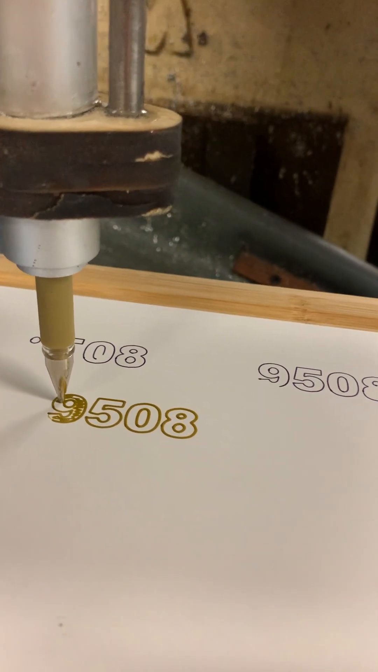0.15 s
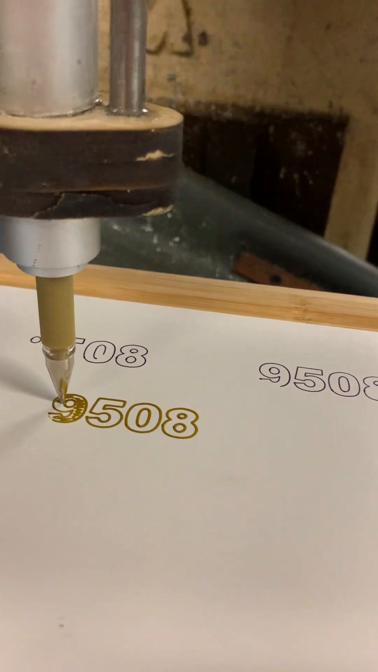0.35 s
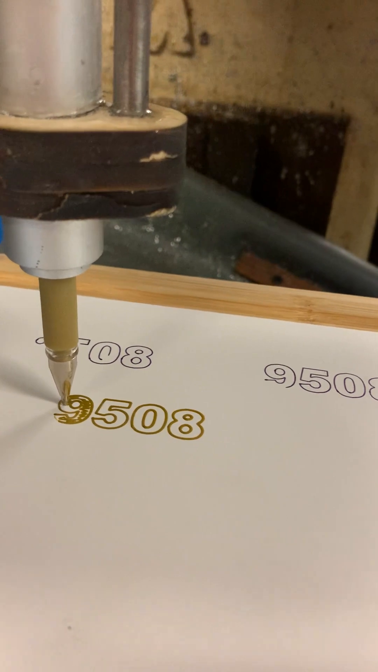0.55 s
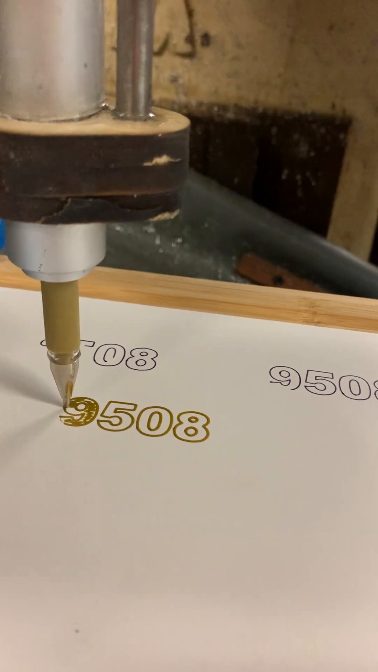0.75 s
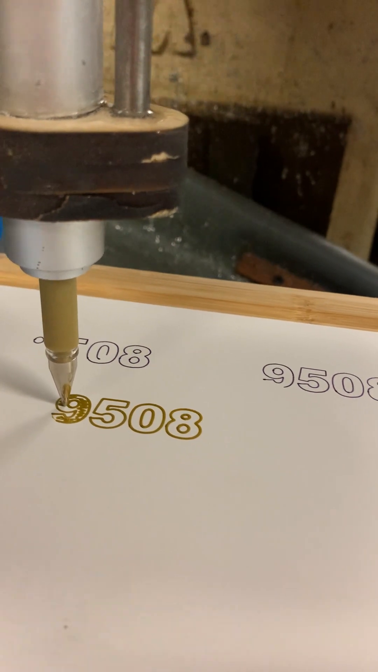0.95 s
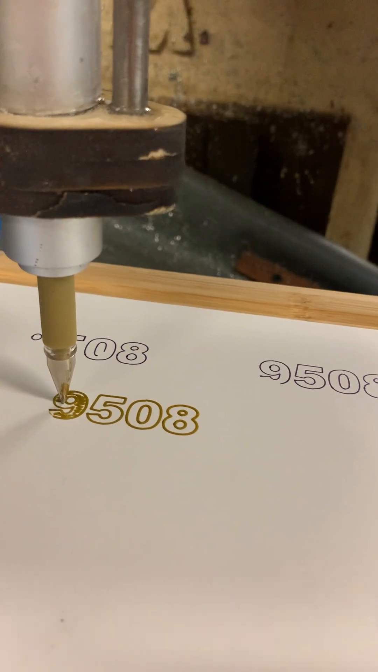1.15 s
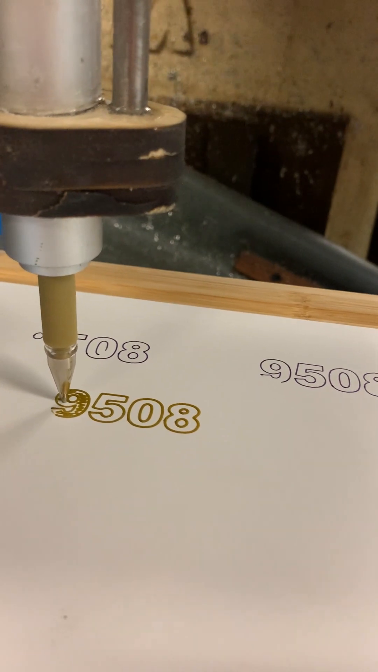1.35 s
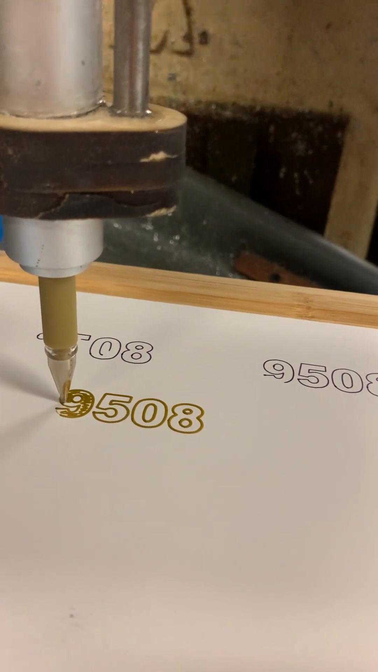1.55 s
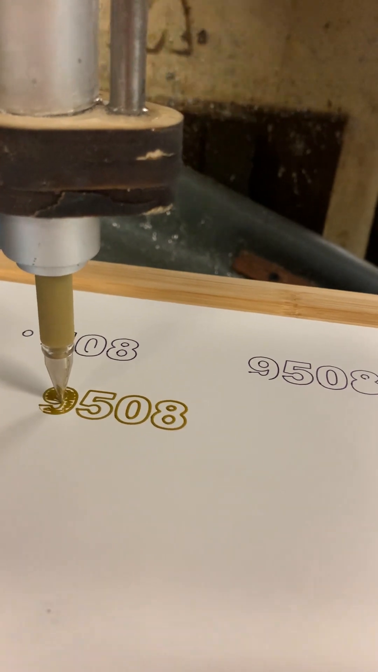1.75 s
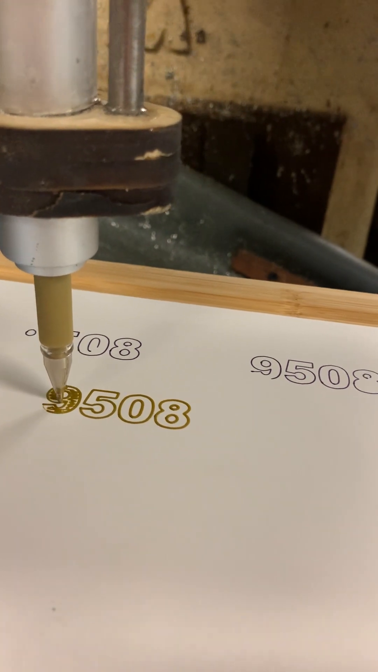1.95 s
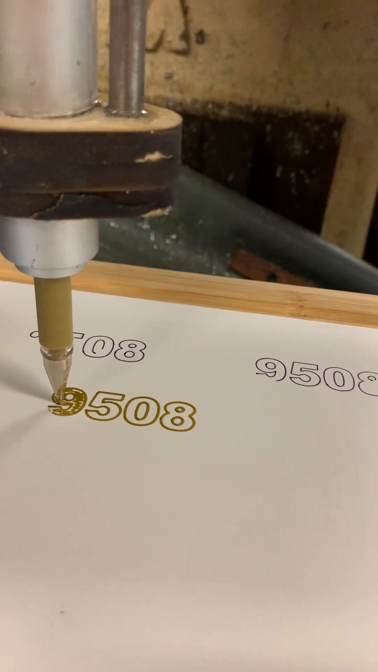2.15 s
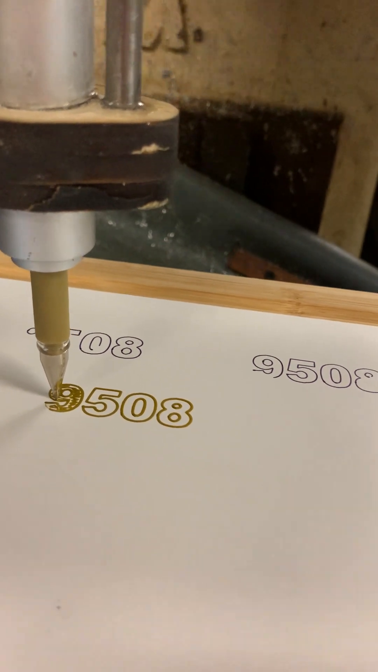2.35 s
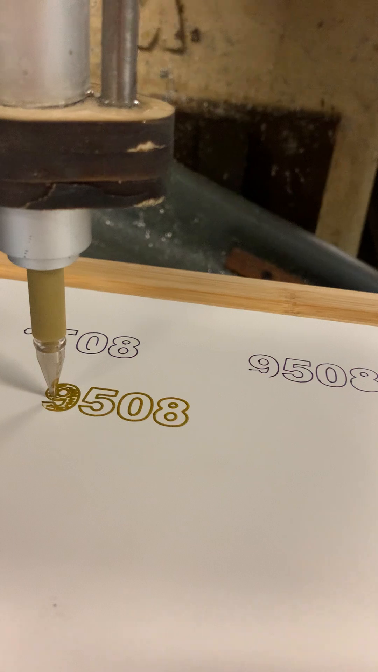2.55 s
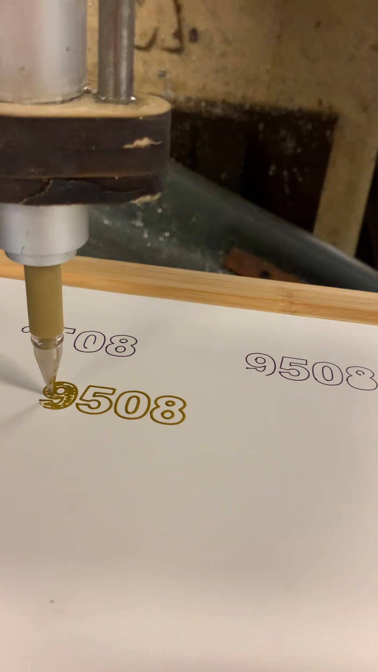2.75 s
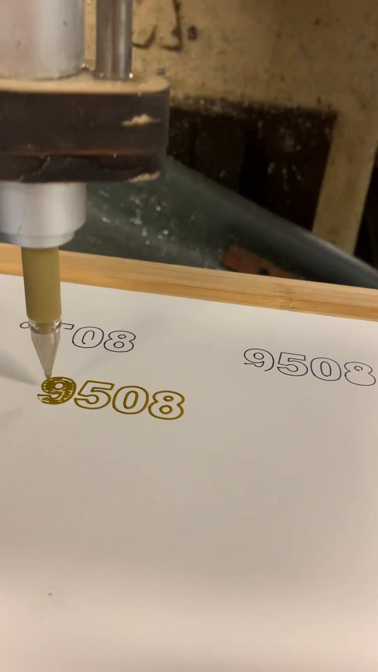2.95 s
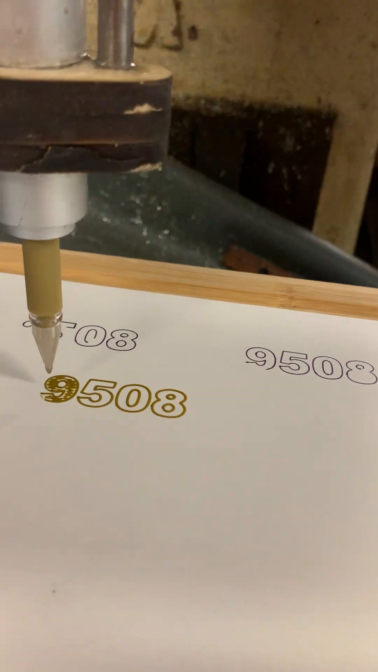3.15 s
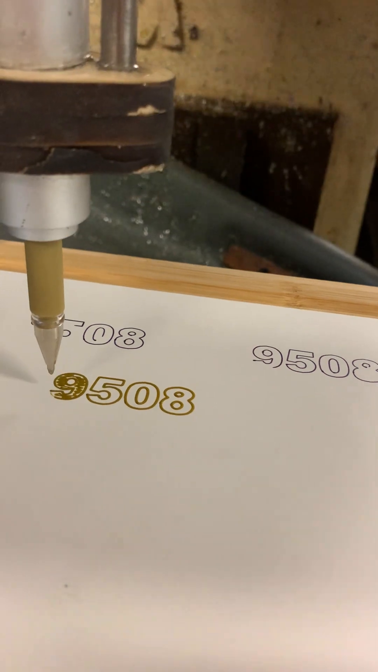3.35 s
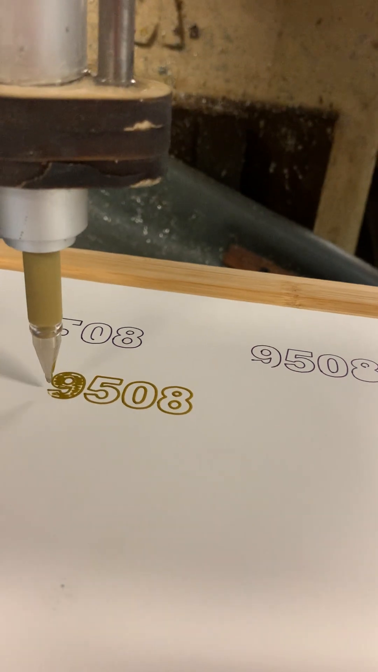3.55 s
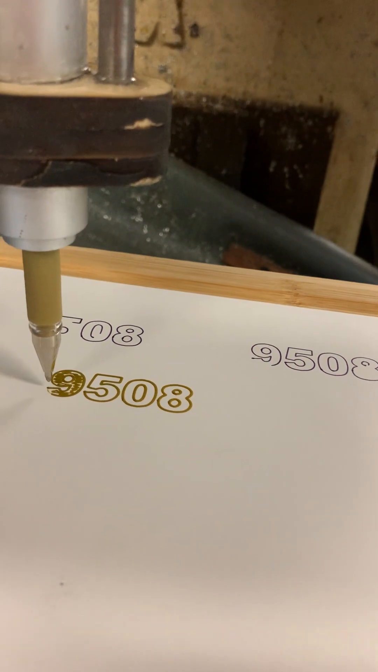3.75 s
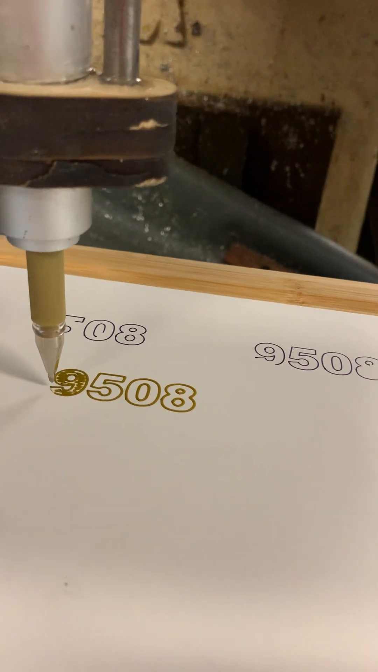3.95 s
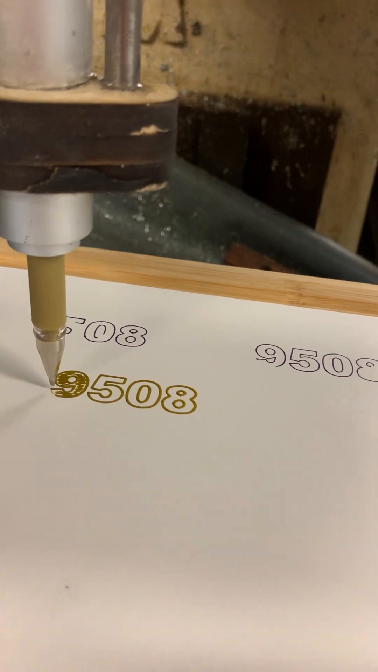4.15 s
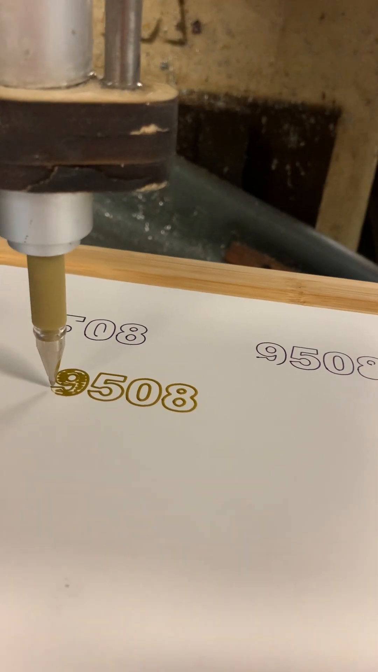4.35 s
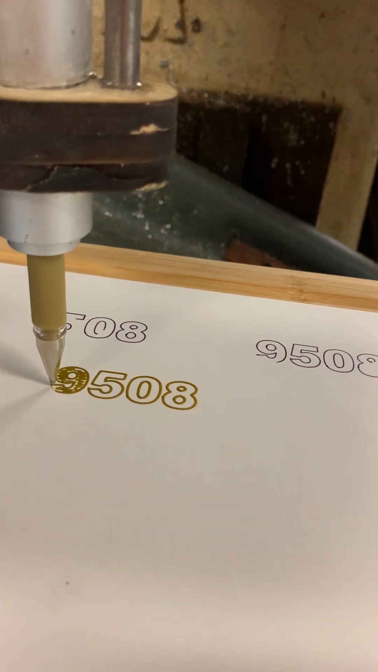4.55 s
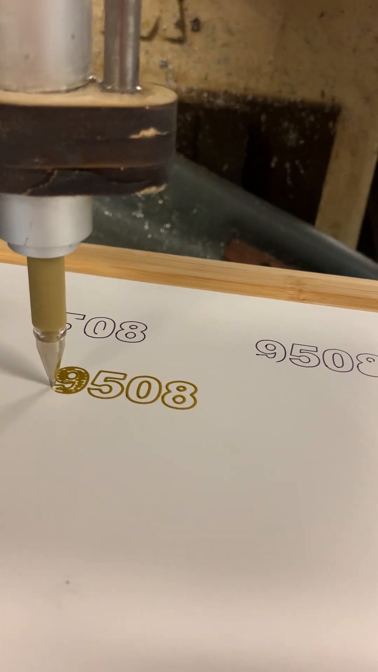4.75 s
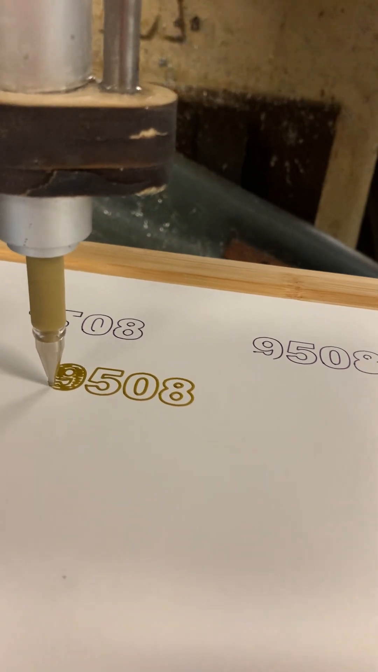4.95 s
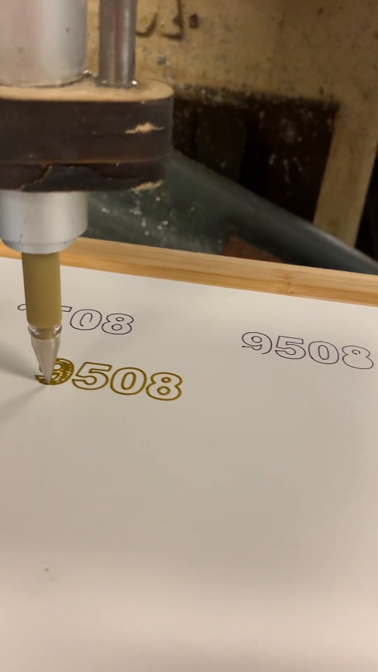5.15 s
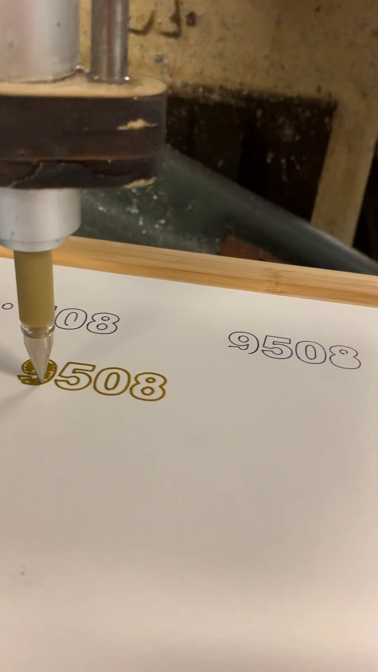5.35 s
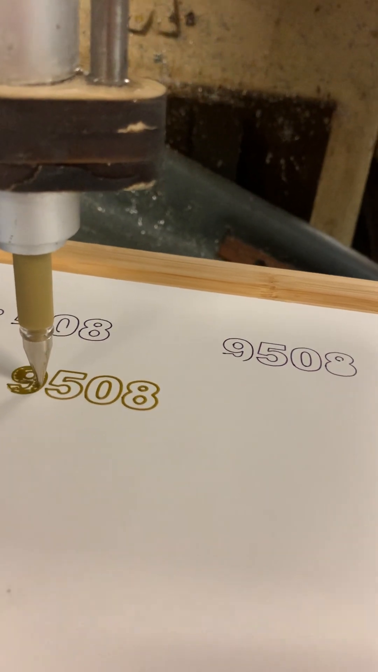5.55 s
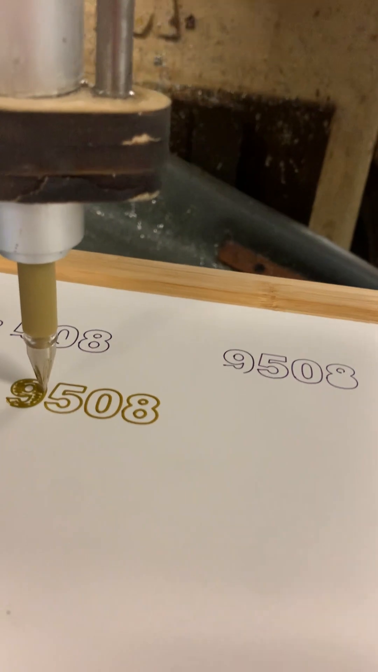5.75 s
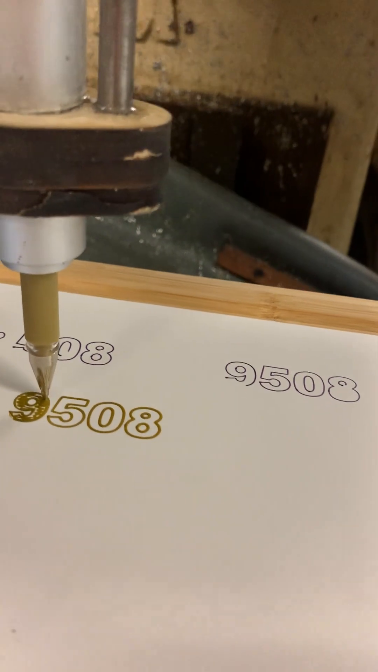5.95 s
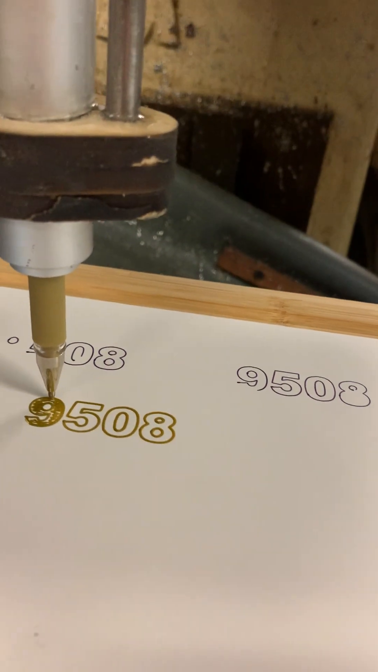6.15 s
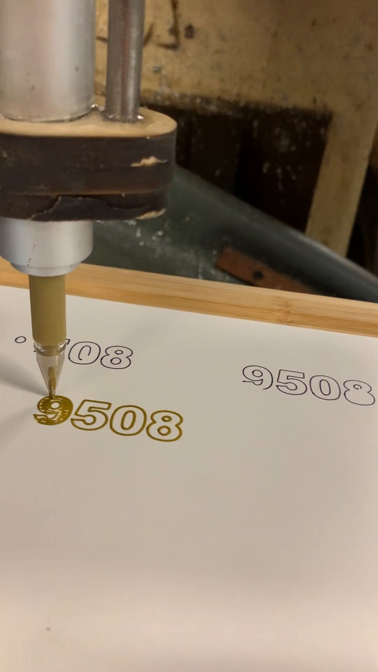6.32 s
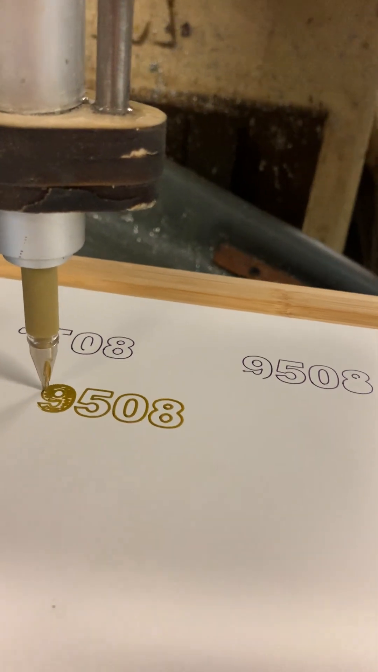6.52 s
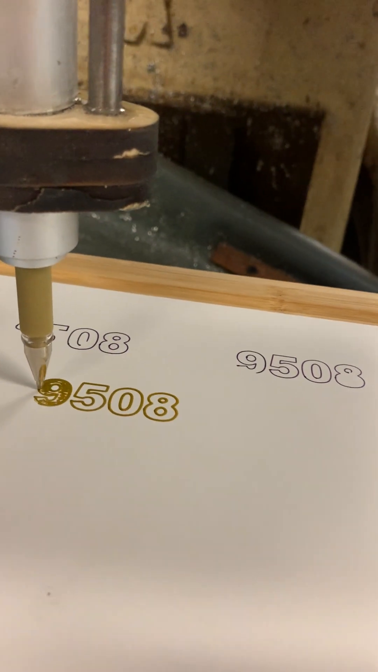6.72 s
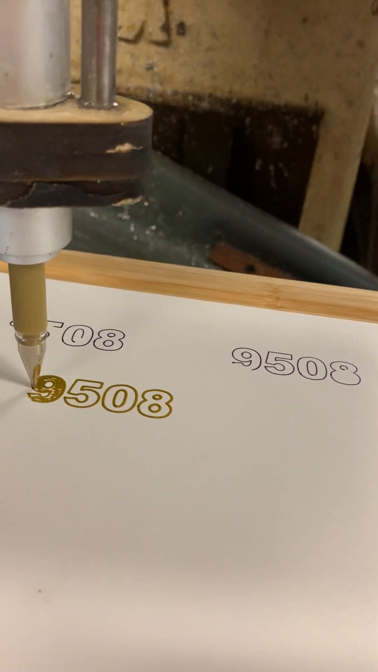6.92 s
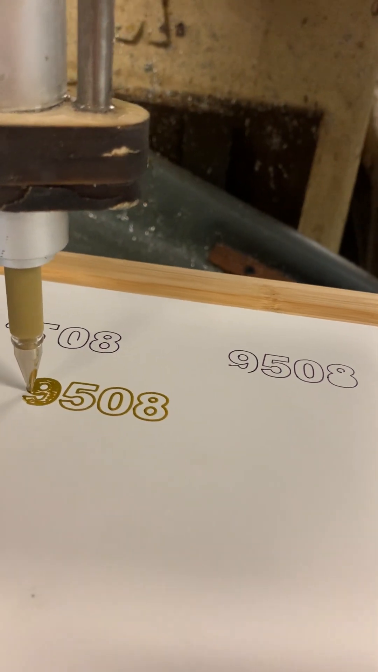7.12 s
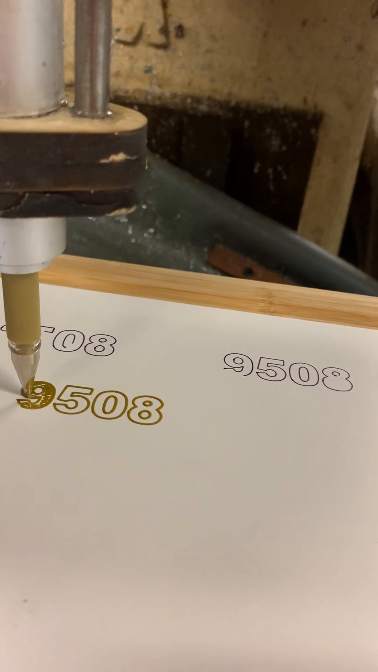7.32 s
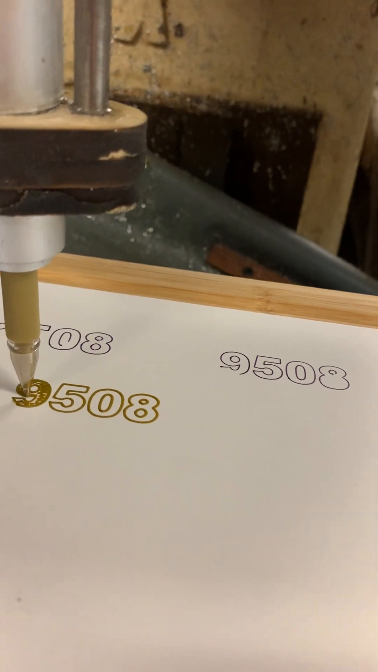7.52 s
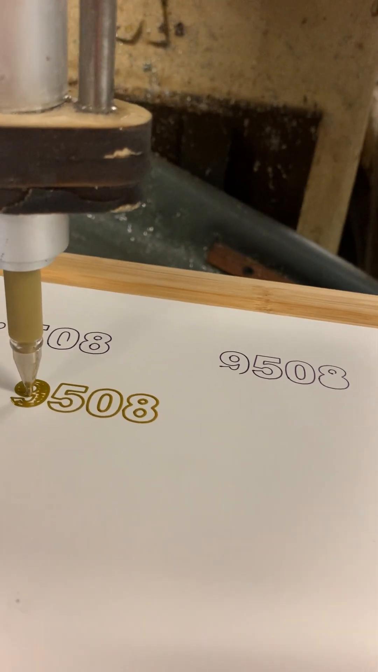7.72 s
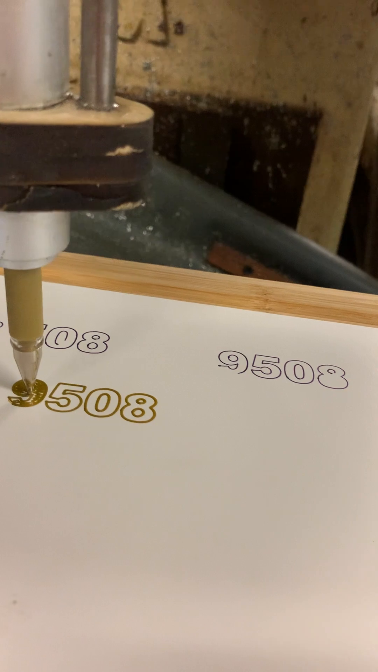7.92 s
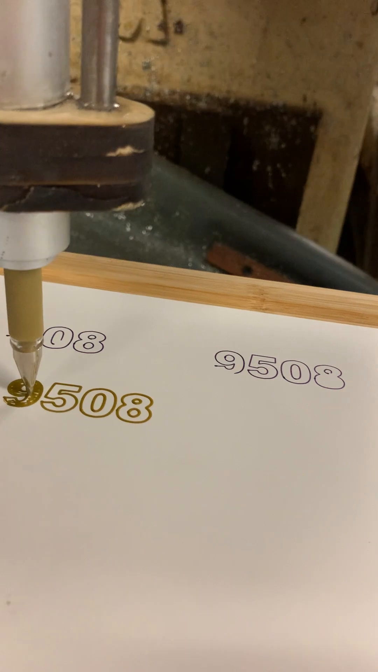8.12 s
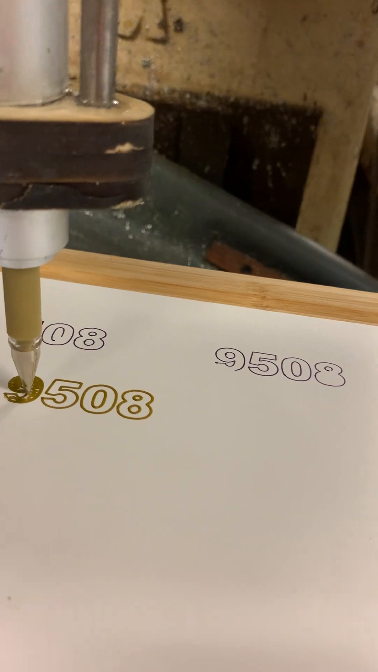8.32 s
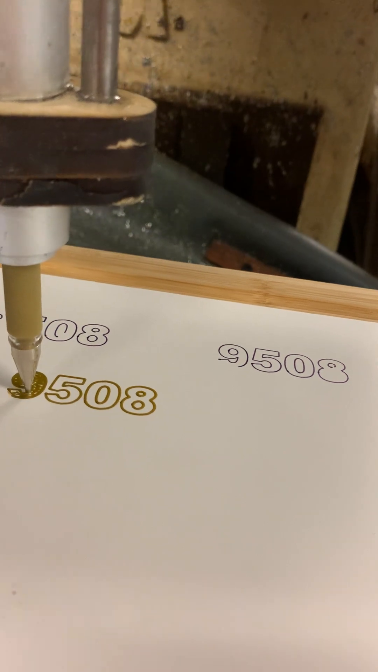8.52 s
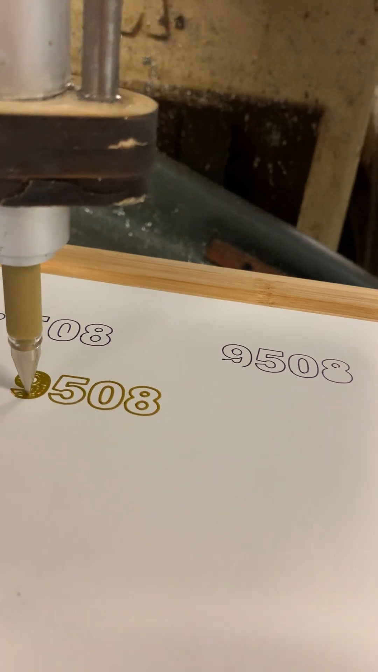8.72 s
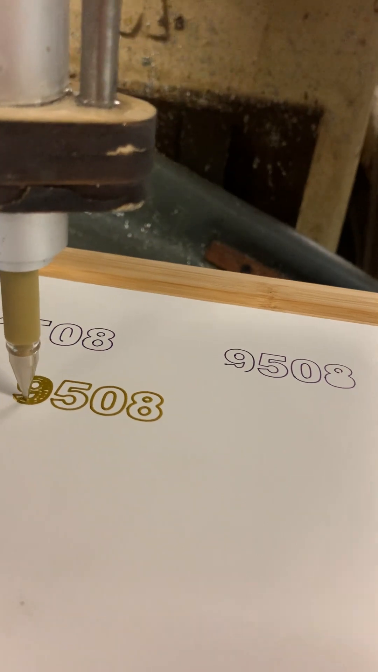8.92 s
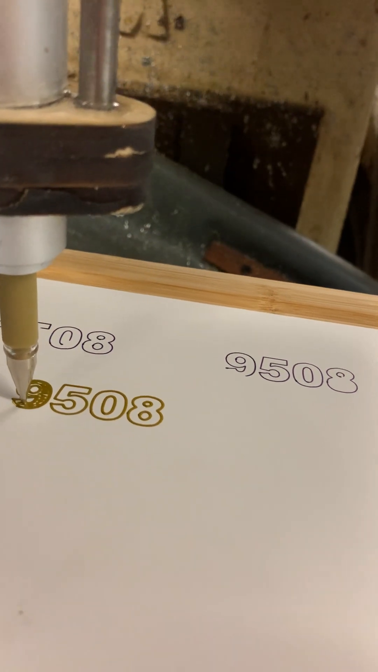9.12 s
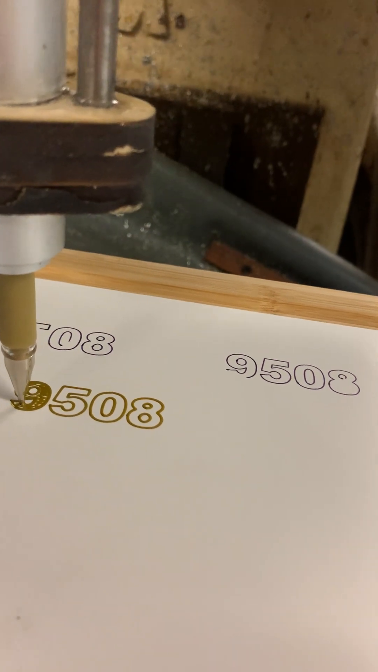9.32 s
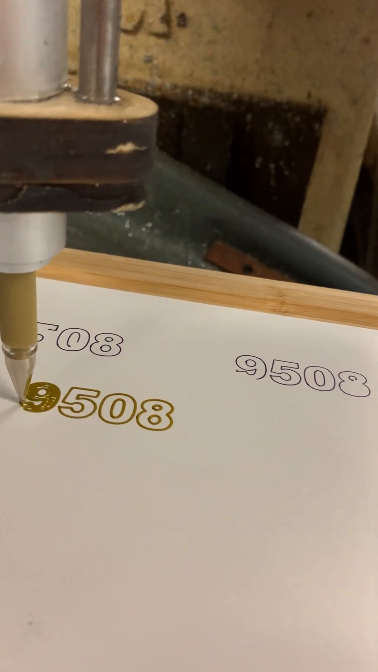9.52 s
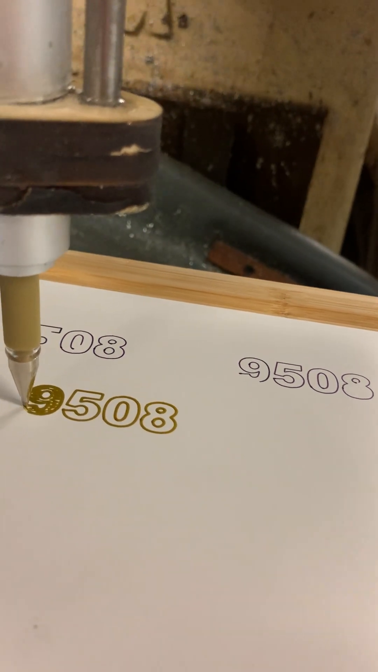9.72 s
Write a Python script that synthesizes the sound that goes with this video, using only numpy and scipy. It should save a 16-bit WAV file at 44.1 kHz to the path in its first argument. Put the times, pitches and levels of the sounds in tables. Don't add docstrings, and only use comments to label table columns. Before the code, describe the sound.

Close stereo pickup of a small motorised drawing machine in an indoor workshop. A low, steady fan and motor rumble lies beneath irregular hollow knocks and short hisses as the carriage reverses. Near three seconds two brief bright rasps lift and lower the pen, rattling the table. Dry, high ticks cluster just after four seconds, then sparser soft knocks continue to the end.

```python
import sys
import numpy as np
from scipy import signal
from scipy.fft import rfft, irfft, next_fast_len
from scipy.io import wavfile
from scipy.ndimage import uniform_filter1d, minimum_filter1d

SR = 44100
rng = np.random.default_rng(int(sys.argv[2]) if len(sys.argv) > 2 else 0)


def wav_out(sig):
    wavfile.write(sys.argv[1], SR, np.round(np.clip(np.atleast_2d(sig).T, -1, 1) * 32767).astype(np.int16))


def voltage_ratio(decibels):
    exponent = np.asarray(decibels, float) / 20
    return 10 ** exponent


N = 431277

# start in seconds, length in seconds, rasp level in dB,
# screw rumble level at full speed in dB, easing-in time in seconds.
LIFTS = [
    (2.854, 0.19, -41, -48, 0.0036),
    (3.429, 0.15, -39.5, -51, 0.0013),
]


def rms_one(x):
    return x / np.sqrt(np.mean(x ** 2) + 1e-20)


def at_hz(points, hz):
    p = np.array(points)
    return np.interp(np.log(hz + 1), np.log(p[:, 0]), p[:, 1])


def coloured(x, spectrum):
    size = next_fast_len(N)
    hz = np.arange(size // 2 + 1) * SR / size
    low_cut = np.minimum(hz / spectrum[0][0], 1) ** 2
    gain = voltage_ratio(at_hz(spectrum, hz)) * low_cut
    return rms_one(irfft(rfft(x, size) * gain, size)[..., :N])


def drift(rate):
    r = np.exp(-80 * np.pi * rate / SR)
    slow = signal.lfilter([1], [1, -2 * r, r * r], rng.standard_normal(N // 40 + 2002))[2000:]
    return np.interp(np.arange(N) / 40, np.arange(len(slow)), rms_one(slow))


def whistle(hz, width_hz):
    r = np.exp(-np.pi * width_hz / SR)
    a = [1, -2 * r * np.cos(2 * np.pi * hz / SR), r * r]
    noise = rng.standard_normal((2, N + SR // 4))
    once = signal.lfilter([1, 0, -1], a, noise)
    return rms_one(signal.lfilter([1], a, once)[:, SR // 4:])


def band(x, hz, octaves):
    edges = np.clip(hz * 2 ** (octaves * np.array([-.5, .5])), 50, .45 * SR)
    return signal.sosfilt(signal.butter(2, edges, "band", fs=SR, output="sos"), x)


def within(hz, low, high):
    return (np.tanh((hz - low) / 70) - np.tanh((hz - high) / 70)) / 2


def runs(rows):
    t = np.arange(N) / SR
    held = sum(voltage_ratio(db) * ((t >= start) & (t < end)) for start, end, db in rows)
    fade_s = 0.08
    return uniform_filter1d(held, size=round(fade_s * SR))


def grit(spread_db):
    return rng.standard_normal((2, N)) * voltage_ratio(spread_db * rng.exponential(1, N).clip(0, 4))


def burst(out_len, decay_s, noise, rise_s=0.00035):
    t = np.arange(out_len) / SR
    return noise * (1 - np.exp(-t / rise_s)) * np.exp(-t / decay_s)


def workshop(level_db):
    # frequency in Hz, density in dB per Hz.
    air_spectrum = [(25, -46), (50, -3), (78, 2.5), (130, -0.9), (260, -7.5), (450, -9.5), (900, -20),
                    (1300, -21.5), (2200, -26), (2900, -32.5), (4400, -36), (6800, -49), (9000, -57.5),
                    (12000, -54.5), (15500, -60)]
    # frequency in Hz, width in Hz, rms level in dB.
    duct_hums = [(77.76, 8.8, -45.5), (94.8, 8.2, -55), (187.3, 59, -44), (256.4, 31, -52.5),
                 (408.2, 9.3, -57.5), (643.6, 36, -57), (881.7, 70, -56.5), (1339, 87, -67),
                 (1620, 90, -65.5), (1871, 100, -64), (2000, 430, -68.5), (2260, 81, -68.5),
                 (3160, 150, -72), (5450, 1700, -67)]
    air = voltage_ratio(level_db + .5 * drift(7.4)) * coloured(rng.standard_normal((2, N)), air_spectrum)
    treble = band(air, 6500, 2.2)
    air += (voltage_ratio(1.4 * drift(83.0)) - 1) * treble
    air += sum((voltage_ratio(1.4 * drift(25.)) - 1) * band(air, hz, 0.6) for hz in (1005, 1400, 1950, 2820))
    return air + sum(voltage_ratio(db) * whistle(hz, width) for hz, width, db in duct_hums)


def motor_tones():
    motor_hz = [76.7, 119.8, 221.4, 256.4, 259.1, 284.6, 331.7, 407.1, 465.0, 596.2, 646.0, 765.8]
    motor_db = [-50.5, -46.5, -52.5, -53, -45.5, -60, -59, -56.5, -61, -63, -60.5, -67]
    out = np.zeros(N)
    for hz, db in zip(motor_hz, motor_db):
        turns = np.cumsum(hz * (1 + .002 * drift(1.5))) / SR + rng.random()
        out += voltage_ratio(db - .5 + 2.5 * drift(3.)) * np.sqrt(2) * np.sin(2 * np.pi * turns)
    return out * [[1], [0]]


def rail_whistle():
    # start in seconds, end in seconds, level in dB.
    working = [(0, 2.07, -64), (2.07, 2.83, -61), (2.85, 3, -55), (3.08, 4.1, -60.5), (3.95, 5.05, -62),
               (5.05, 6.7, -64.5), (7.0, 7.74, -66.5), (7.74, 8.85, -64), (8.85, 9.42, -65.5),
               (9.42, 11.5, -60)]
    # time in seconds, level in dB.
    jerks = [(2.873, -39), (2.913, -33.5), (2.942, -46), (2.966, -48), (2.988, -47), (3.008, -47),
             (3.027, -46), (3.048, -49), (3.41, -49), (3.434, -51), (3.446, -43), (3.462, -52),
             (3.484, -49), (3.522, -51), (3.556, -44), (3.59, -55), (3.602, -57), (2.078, -48.5),
             (1.359, -51), (1.374, -46), (9.51, -49), (9.528, -54), (9.572, -54)]
    whistle_hz, width_hz = 3730, 115.
    attack_s, decay_s, tail_db, tail_s = .003, 0.007, -26, 0.04
    struck = np.zeros(N)
    for s, db in jerks:
        t = np.maximum(np.arange(N) / SR - s, 0)
        dying = np.exp(-t / decay_s) + voltage_ratio(tail_db) * np.exp(-t / tail_s)
        struck += voltage_ratio(db + 7.5) * (1 - np.exp(-t / attack_s)) * dying
    ring = np.sin(2 * np.pi * np.cumsum(whistle_hz + 30 * drift(30.)) / SR)
    return runs(working) * whistle(whistle_hz, width_hz) + struck * ring * [[1], [0]]


def driver_tone():
    # start in seconds, end in seconds, level in dB.
    holding = [(1.7, 1.95, -74), (2.5, 2.86, -83), (2.86, 3.3, -75), (3.63, 4.2, -69.5), (4.2, 4.78, -71.5),
               (4.78, 5.1, -82), (5.1, 5.5, -74), (5.5, 5.72, -82), (5.72, 5.87, -75), (5.87, 6.42, -69.5),
               (6.42, 6.75, -75), (6.75, 7.15, -77), (7.15, 9.42, -72)]
    driver_hz, step_hz = 10314, 49.9
    turns = np.cumsum(driver_hz + 8.0 * drift(60.)) / SR
    steps = np.sin(2 * np.pi * step_hz * np.arange(N) / SR)
    flicker = voltage_ratio(-1.5 + 2.5 * drift(90.) + 3.0 * steps)
    tone = runs(holding) * flicker * np.sqrt(2) * np.sin(2 * np.pi * turns)
    return tone * [[1], [0]]


def carriage_moves():
    # start in seconds, length in seconds, level in dB.
    long_moves = [(0.058, 0.095, -61.5), (0.526, .075, -62), (.857, 0.089, -61), (1.037, .06, -75),
                  (1.357, 0.077, -58.5), (1.626, 0.081, -53), (3.167, 0.069, -58.5), (3.74, .14, -69),
                  (4.892, 0.31, -65), (5.2, 0.14, -67), (6.027, 0.075, -61), (9.424, .081, -60.5),
                  (9.598, .15, -71)]
    # start in seconds,
    # length in seconds, level in dB, centre in Hz.
    creeps = [(0.01, 6.7, -87, 14600), (1.978, 0.038, -64, 11000), (2.075, 0.046, -67, 8460),
              (5.357, 0.15, -67, 13200), (5.58, 0.13, -71.5, 13320), (5.775, .17, -70.5, 13400),
              (6.22, .08, -68, 11100), (6.422, 0.087, -61, 12400), (6.63, 0.065, -64, 12500),
              (7.95, .004, -66, 14000), (8.368, .08, -67, 13300), (9.234, .02, -67, 15220)]
    # start in seconds, length in seconds, level in dB,
    # centre in Hz.
    drags = [(1.6, 0.14, -46, 660), (1.688, 0.04, -45, 990), (3.156, 0.066, -44, 1300),
             (3.59, 0.028, -47, 880), (3.08, 0.18, -48, 661), (2.93, 0.098, -40, 550),
             (2.966, 0.057, -39.5, 207), (3.47, .1, -51, 1480), (3.5, .08, -44, 420),
             (2.8, 0.085, -38.5, 204.3), (3.483, 0.035, -35, 202)]
    # start in seconds,
    # length in seconds, level in dB, centre in Hz.
    narrow_hisses = [(.01, 9.7, -81, 9880), (6.85, 1.3, -86, 10500), (1.98, 0.035, -66, 11300),
                     (2.99, 0.026, -44, 11500), (3.535, 0.021, -39, 10630), (2.868, .035, -47, 10100),
                     (2.876, .006, -48, 6850), (2.94, .03, -45, 11500), (2.975, .025, -45, 15000),
                     (3.017, 0.018, -54, 7200), (3.44, .04, -54, 7600), (3.465, .015, -48, 11400),
                     (3.44, .03, -47, 9890), (3.495, .04, -47, 15200)]
    moves = [(*row, 8400, 1.8) for row in long_moves]
    for rows, octaves in ((creeps, 0.51), (drags, 0.51), (narrow_hisses, .1)):
        moves += [(*row, octaves) for row in rows]
    out = np.zeros((2, N))
    rubbing = grit(1.5) * voltage_ratio(1.6 * drift(60.))
    for s, length, db, hz, octaves in moves:
        i = round(s * SR)
        t = np.arange(min(round((length + 0.11) * SR), N - i)) / SR
        shape = (1 - np.exp(-t / 0.0072)) * np.exp(-np.maximum(t - length, 0) / 0.021)
        hiss = band(band(rubbing[:, i:i + len(t)], hz, octaves), hz, 2 * octaves)
        out[:, i:i + len(t)] += voltage_ratio(db) * shape * rms_one(hiss)
    return out


def knocks():
    # frequency in Hz, level in dB, t60 in seconds.
    frame_modes = [(1566, -9, 0.06), (1854, -11, 0.055), (2120, -9, 0.03), (2420, -23, 0.025),
                   (3200, -15, 0.05)]
    # frequency in Hz, level in dB, t60 in seconds.
    voiced_modes = [
        (1340, -6, .09),
        (2296, 1, .24),
        (2130, 5, .09),
    ]
    # time in seconds, peak in dB, crack in dB,
    # rail ring in dB.
    bed_knocks = [(1.0316, -37.5, -7, -3), (1.3564, -32, -10.5, -6.5), (2.8757, -39, -27, -25),
                  (3.4762, -31, -25, -25), (3.5825, -48, -25, -25), (6.024, -35.5, -8, 1.5),
                  (9.4227, -35.5, -11, -10), (9.429, -30, -25, -25)]
    # time in seconds, peak in dB, crack in dB,
    # rail ring in dB.
    plate_knocks = [(.5227, -31.5, -14, -6), (.892, -36, -29, -14), (1.728, -33.5, -9.5, -11),
                    (2.9132, -37, -25, -25), (2.9366, -29, -25, -25), (2.958, -35, -25, -25),
                    (3.4099, -39, -25, -25), (3.518, -38, -25, -25), (5.162, -34, -24, -13),
                    (5.4416, -31, -21, -8), (5.4634, -37, -9.5, -12), (6.204, -38, -12, -12),
                    (6.555, -38.5, -14, -12.5), (7.746, -42, -9, -13), (8.648, -37, -23, -18),
                    (8.9364, -40, -15, -9), (9.102, -36.5, -30, -19)]
    # time in seconds, peak in dB, crack in dB, rail ring in dB.
    rail_knocks = [(.503, -40, -30, 0), (.5394, -40, -7, -12), (.6903, -34, -29, -12), (1.05, -45, -25, -2),
                   (1.07, -42, -23, -2), (1.334, -36, -22, -6), (1.3742, -32.5, -10, -5),
                   (1.456, -42, -25, -6), (2.0794, -48.5, 2, 2), (3.1594, -32.5, -14, -4),
                   (3.325, -38, -28, -7), (7.1837, -48, -11, -13), (7.5794, -30.5, -34, -4),
                   (9.437, -36, -22, -2.5)]
    # low mode in dB, plate mode in dB, free ringing in seconds.
    axis_voice = [
        (4, -13, 0.034),
        (-1, -7, 0.016),
        (-11, -20, 0.033),
    ]
    # frequency in Hz, level in dB, t60 in seconds.
    bed_boom = (312, -2, 0.19)
    boom_hz, boom_db, boom_t60 = bed_boom
    out, t = np.zeros((2, N)), np.arange(6000) / SR
    hz, mode_db, t60 = np.transpose(frame_modes + voiced_modes)[:, :, None]
    axes = zip((bed_knocks, plate_knocks, rail_knocks), axis_voice)
    hits = [(*row, *voice) for rows, voice in axes for row in rows]
    for s, db, crack_db, rail_db, low_db, plate_db, hold_s in hits:
        crack_noise, body_noise = rng.standard_normal((2, 2, 2500))
        strong, detune, phase = rng.standard_normal((3, len(hz), 1))
        i = round(s * SR)
        strength_db = np.append(2 * strong[:len(frame_modes)], [low_db, rail_db, plate_db])[:, None]
        damping_db = 904 * np.maximum(t - hold_s, 0)
        decay = voltage_ratio(db + mode_db + strength_db - 60 * t / t60 - damping_db) * (1 - np.exp(-t / .0025))
        angle = 2 * np.pi * (hz * (1 + .003 * detune) * t + phase)
        out[:, i:i + 6000] += [np.sum(decay * wave(angle), axis=0) for wave in (np.sin, np.cos)]
        crack = rms_one(band(crack_noise, 4100, 1.9) + 1.1 * band(crack_noise, 5680, 0.31))
        out[:, i:i + 2500] += voltage_ratio(db + crack_db - 4.0) * burst(2500, 0.019, crack, rise_s=0.002)
        if low_db > 0:
            boom = voltage_ratio(db + boom_db - 60 * t / boom_t60) * (1 - np.exp(-t / 0.01))
            out[0, i:i + 6000] += boom * np.sin(2 * np.pi * boom_hz * t)
        body = rms_one(band(body_noise, 1450, 2.1))
        out[:, i:i + 2500] += voltage_ratio(db - 11.5) * burst(2500, 0.013, body)
    return out


def ticks():
    # time in seconds, peak in dB, wide puff against the ring in dB, ring in Hz.
    tick_events = [(1.502, -54, -10, 10100), (2.1987, -53, -8, 15000), (2.2807, -58, -3, 9800),
                   (2.3219, -64, -5, 9900), (2.3625, -59, -5, 9700), (2.4034, -59, -5, 9900),
                   (2.4394, -58, -5, 9850), (2.6267, -68, -5, 10300), (2.6652, -67, -5, 10300),
                   (2.6988, -48.5, -12, 10300), (2.7387, -59, -8, 10300), (2.7811, -56, -6, 10300),
                   (2.8258, -62, -8, 10300), (3.408, -53, -9, 11000), (3.419, -59, -5, 12000),
                   (3.7437, -61, -12, 6870), (3.7806, -53, -6, 6770), (3.8011, -55, -8, 6870),
                   (3.8625, -60, -10, 7600), (3.9493, -55, -8, 6100), (3.9605, -59, -8, 10500),
                   (3.9912, -60, -8, 6600), (4.0758, -60, -14, 11930), (4.137, -48, 4, 11400),
                   (4.1579, -42, -1, 10700), (4.1796, -38, -14, 10300), (4.339, -47.5, -16, 10600),
                   (4.38, -45, -4, 10500), (4.4922, -64, 0, 11600), (4.5282, -66, -5, 10520),
                   (4.5745, -49, -1, 10400), (4.6153, -44.5, 3, 10400), (4.658, -37, -16, 10400),
                   (4.6956, -42.5, 4, 10600), (4.7176, -34, -7, 10600), (4.739, -40, -2, 10800),
                   (4.7555, -56, -5, 10500), (4.632, -56, -10, 7600), (4.712, -52, -10, 7600),
                   (4.7955, -53, 6, 10600), (4.7958, -52, -10, 7300), (4.8909, -65, -3, 10800),
                   (4.9701, -58, -5, 10600), (6.6258, -57, -3, 11000), (6.6732, -62, -5, 11000),
                   (6.6944, -68, -5, 11000), (8.0994, -68, -5, 10500), (9.7058, -58, -8.5, 10400)]
    # frequency in Hz, level in dB, decay in seconds.
    block_modes = [(9840, -8, .005), (10200, -5, .005), (10700, -4, 0.0068), (11700, -9, .004)]
    out, t = np.zeros((2, N)), np.arange(3000) / SR
    for s, db, wide_db, ring_hz in tick_events:
        wide, narrow, tail = rng.standard_normal((3, 2, 3000))
        strong, phase = rng.standard_normal(2)
        i = round(s * SR)
        tick = voltage_ratio(wide_db) * burst(3000, 0.0032, rms_one(band(wide, 11000, 1.2)))
        ring = rms_one(band(band(narrow, ring_hz, 0.23), ring_hz, 0.71))
        tick += voltage_ratio(-1.0) * burst(3000, 0.006, ring, rise_s=0.00096)
        for hz, mode_db, decay_s in block_modes:
            if abs(ring_hz - hz) < 1200:
                mode = np.sin(2 * np.pi * hz * t + phase)
                tick[0] += voltage_ratio(mode_db + 2.9 * strong) * burst(3000, decay_s, mode)
        tick += voltage_ratio(-16.5) * burst(3000, 0.031, rms_one(band(tail, 10200, 0.53)))
        out[:, i:i + 3000] += voltage_ratio(db) * tick[:, :N - i]
    return out


def lift_rasp():
    # frequency in Hz, density in dB per Hz.
    rasp_spectrum = [(3000, -12), (4500, -15), (5500, -6), (7000, -1), (8500, 0), (10000, 11), (12000, 4),
                     (13500, 4), (15500, 4)]
    # frequency in Hz, width in Hz, level against the rasp in dB.
    housing = [(6850, 80., -20.5), (7200, 60., -30), (7600, 65, -19), (9890, 90., -11), (10400, 80., -16),
               (10630, 60, -13), (11300, 200, -17), (11800, 70., -17), (12400, 80., -19), (13900, 90., -25),
               (14950, 170., -22), (15500, 160., -18)]
    # upper edge in Hz, extra loss at the end in dB.
    dull_part = (8900, -7)
    # lower edge in Hz, extra loss at the end in dB.
    top_part = (12500, -8)
    (dull_hz, dull_db), (top_hz, top_db) = dull_part, top_part
    stop_s, tail_db, tail_s = 0.0026, -16.5, 0.052
    level, travel = np.zeros(N), np.zeros(N)
    for s, length, rasp_db, _, ease in LIFTS:
        t = np.arange(N) / SR - s
        done, after = np.clip(t / length, 0, 1), np.maximum(t - length, 0)
        attack = 1 / (1 + np.exp(np.clip(3.5 - t / ease, -50, 50)))
        release = np.exp(-after / stop_s) + voltage_ratio(tail_db) * np.exp(-after / tail_s)
        sag_db = 1800. * ease * done ** 4.9
        level += voltage_ratio(rasp_db - sag_db) * attack * release
        travel += done * (after < .2)
    bright = coloured(grit(1.5), rasp_spectrum)
    bright += sum(voltage_ratio(db - 1.5 + 4.0 * drift(18.0)) * whistle(hz, width) for hz, width, db in housing)
    dull = signal.sosfilt(signal.butter(4, dull_hz, fs=SR, output="sos"), bright)
    top = signal.sosfilt(signal.butter(4, top_hz, "high", fs=SR, output="sos"), bright)
    middle = band(bright, np.sqrt(dull_hz * top_hz), np.log2(top_hz / dull_hz))
    narrowing = voltage_ratio(dull_db * travel ** 2.9 + 0.84 * drift(30.)) * dull
    narrowing += voltage_ratio(0.79 * drift(25.0)) * middle
    narrowing += voltage_ratio(top_db * travel ** 3.4 + 2.8 * drift(30.)) * top
    return voltage_ratio(7.0 + 1.4 * drift(120.)) * level * narrowing


def lift_rumble():
    # frequency in Hz, density in dB per Hz.
    screw_spectrum = [(100, -9), (190, 5.5), (400, 1), (700, -4.5), (1200, -16), (2100, -8.5), (3000, -32),
                      (4500, -22)]
    # frequency in Hz, width in Hz, level against the rumble in dB.
    table_modes = [(925, 20, -16), (1387, 140, -17), (2090, 160, -18), (2710, 61, -28), (3090, 470, -22.5)]
    level = np.zeros(N)
    for s, length, _, rumble_db, _ in LIFTS:
        t = np.arange(N) / SR - s
        peak_s = 0.62 * length
        rising = np.sin(np.pi / 2 * np.clip(t / peak_s, 0, 1))
        level += voltage_ratio(rumble_db) * rising * np.exp(-(np.maximum(t - peak_s, 0) / 0.061) ** 1.7)
    frame = coloured(rng.standard_normal((2, N)), screw_spectrum)
    frame += sum(voltage_ratio(db + 3.7 * drift(25.)) * whistle(hz, width) for hz, width, db in table_modes)
    return voltage_ratio(16.0 + 1.2 * drift(28.0)) * level * frame


def scene():
    room = workshop(-36) + motor_tones()
    carriage = rail_whistle() + driver_tone() + carriage_moves() + knocks() + ticks()
    return room + carriage + lift_rasp() + lift_rumble()


def sum_gaps(total, dry, hz, size):
    # lower edge in Hz, upper edge in Hz.
    usual_gaps = [(8350, 9560), (12600, 13700)]
    # lower edge in Hz, upper edge in Hz.
    narrow_gaps = [(8450, 9100), (12950, 13400)]
    # lower edge in Hz, upper edge in Hz.
    loud_gap = (4300, 5200)
    # lower edge in Hz, upper edge in Hz; then the share of time they are lost.
    loud_edges, edge_share = [(3980, 4300), (5200, 5480)], .7
    # lower edge in Hz, upper edge in Hz, share always lost, chance needed to lose it all.
    patchy_gaps = [(4680, 4980, .6, -.6), (4400, 4680, 0, .8), (4980, 5200, 0, 1.1)]

    def part(*gaps):
        return irfft(total * sum(within(hz, *gap) for gap in gaps), size)[:N]

    power = band(dry[0], 11000, .8) ** 2
    treble = uniform_filter1d(power, size=2048, origin=900)
    loud = uniform_filter1d(1.0 * (treble > voltage_ratio(2 * -49)), size=400)
    quick = uniform_filter1d(power, size=128)
    before = uniform_filter1d(quick, size=441, origin=220)
    sudden = np.roll(quick, -130) > 6 * before
    calm = minimum_filter1d(1.0 * ~sudden, size=round(.022 * SR))
    steady = uniform_filter1d(calm, size=300)
    depth = steady * np.clip(.9 + .07 * drift(12.), 0, .99)
    chance = drift(12.)
    patches = np.zeros(N)
    for low, high, always, need in patchy_gaps:
        share = uniform_filter1d(np.where(chance > need, .97, always), size=600)
        patches += share * part((low, high))
    wider = part(loud_gap)
    blocks = np.arange(N) // 1024
    for edge in loud_edges:
        falls = rng.random(blocks[-1] + 1)[blocks] < edge_share
        wider += uniform_filter1d(1.0 * falls, size=200) * part(edge)
    quiet_loss = depth * (1 - loud) * part(*usual_gaps) + steady * (1 - loud) * patches
    loud_loss = steady * loud * part(*narrow_gaps) + loud * wider
    return quiet_loss + loud_loss


def low_pass(x):
    return signal.sosfilt(signal.butter(12, 16910, fs=SR, output="sos"), x)


def record(dry):
    # frequency in Hz, share heard alike on both sides from 0 to 1.
    likeness = [(60, .997), (140, .99), (330, .92), (500, .6), (900, .28), (1800, .4), (3000, .63),
                (4200, .85), (5200, .9), (7000, .96), (16000, .97)]
    # frequency in Hz, lead in radians.
    left_lead = [(0, 0), (500, .1), (2840, .9), (3700, 1.5), (4850, 3.14), (6950, 6.28), (8950, 9.42),
                 (11150, 12.57), (13100, 15.71), (15200, 18.85)]
    # frequency in Hz, left minus right in dB.
    left_tilt = [(60, .4), (200, 1.0), (330, .6), (700, -1.0), (1400, 0), (2800, -.7), (5000, 0)]
    # lower edge in Hz, upper edge in Hz.
    difference_gaps = [(6370, 7490), (10750, 11600), (14700, 17000)]
    cutoff_hz = 15870
    size = next_fast_len(N + 2048)
    hz = np.arange(size // 2 + 1) * SR / size
    shared, differing = rfft(dry, size) * within(hz, -1000, cutoff_hz)
    alike = np.clip(at_hz(likeness, hz), 0, 1)
    side = np.array([[1], [-1]])
    pair = np.sqrt((1 + alike) / 2) * shared + side * np.sqrt((1 - alike) / 2) * differing
    lead = np.interp(hz, *np.transpose(left_lead))
    left, right = pair * np.exp(.5j * side * lead) * voltage_ratio(side * at_hz(left_tilt, hz) / 2)
    total = (left + right) / 2
    difference = (left - right) / 2 * (1 - .98 * sum(within(hz, *gap) for gap in difference_gaps))
    stereo = irfft(total + side * difference, size)[:, :N]
    return low_pass(stereo - sum_gaps(total, dry, hz, size))


dry = scene()
out = record(dry)
wav_out(out)
```